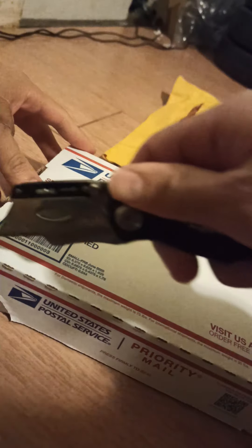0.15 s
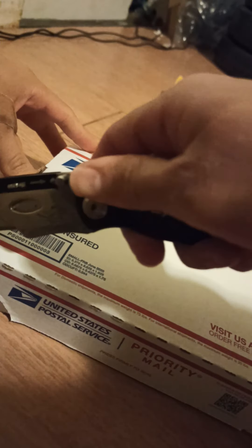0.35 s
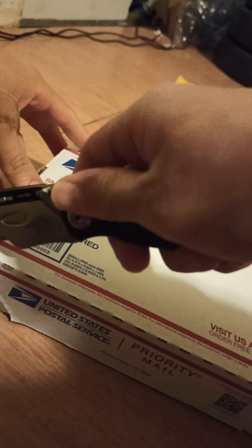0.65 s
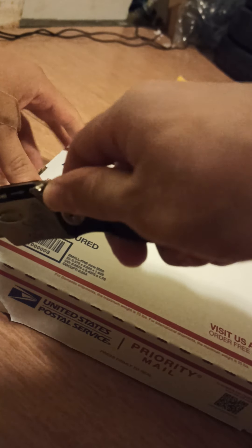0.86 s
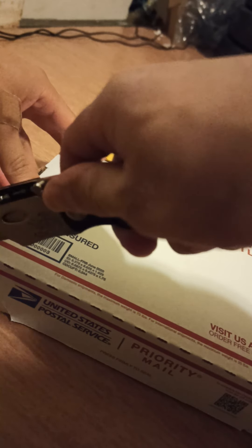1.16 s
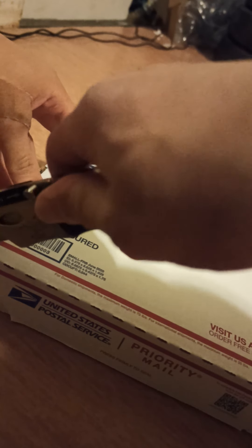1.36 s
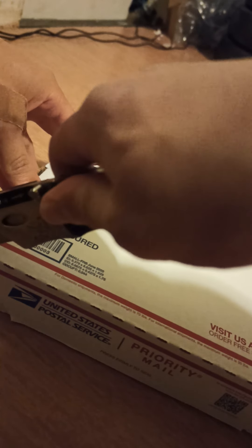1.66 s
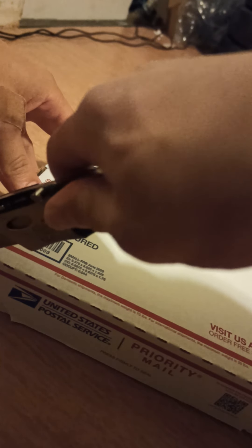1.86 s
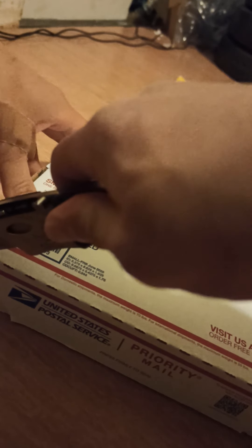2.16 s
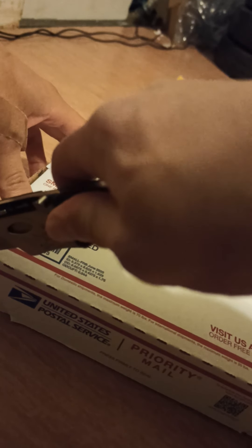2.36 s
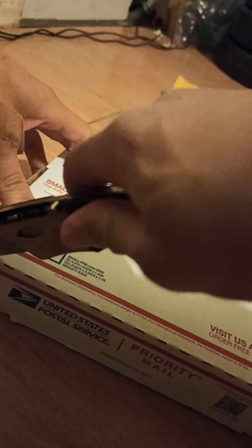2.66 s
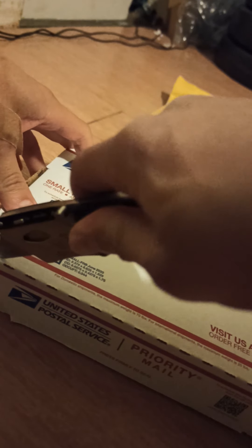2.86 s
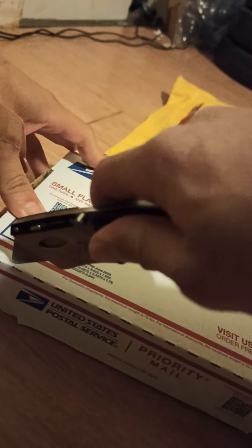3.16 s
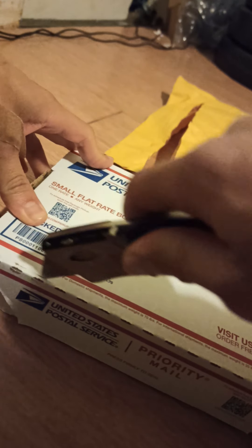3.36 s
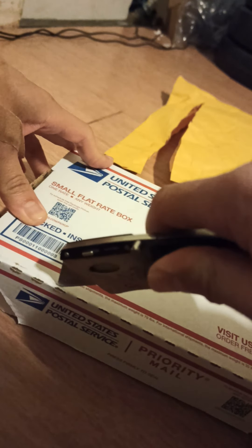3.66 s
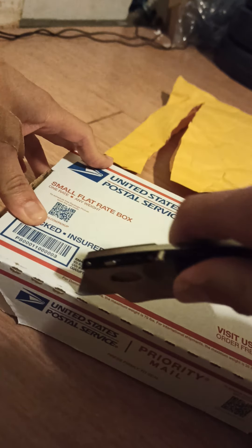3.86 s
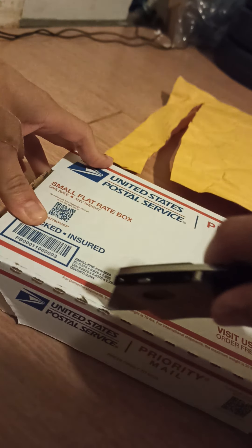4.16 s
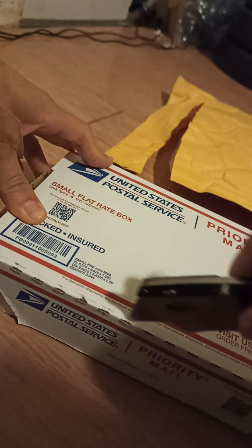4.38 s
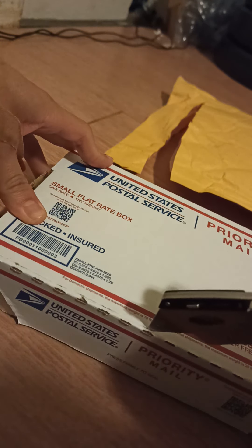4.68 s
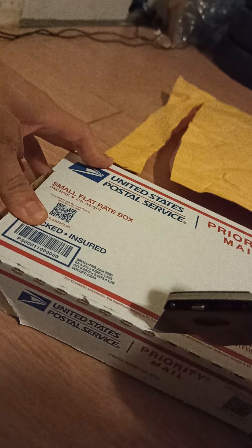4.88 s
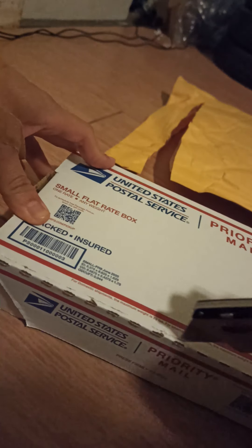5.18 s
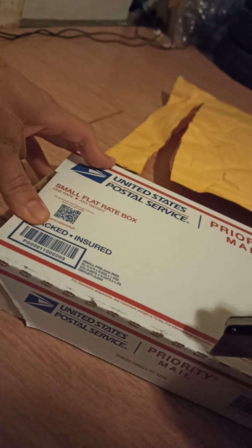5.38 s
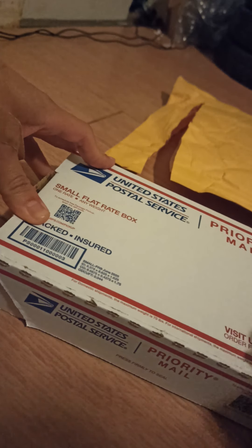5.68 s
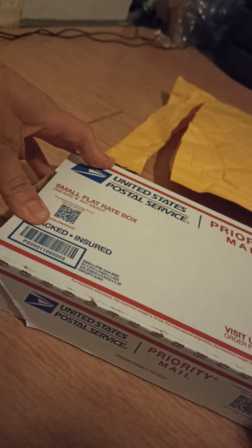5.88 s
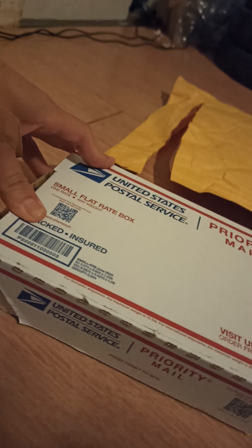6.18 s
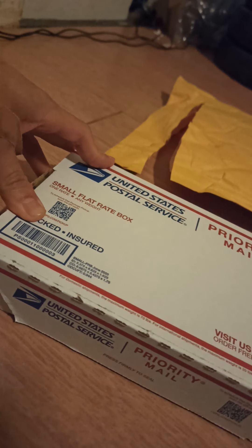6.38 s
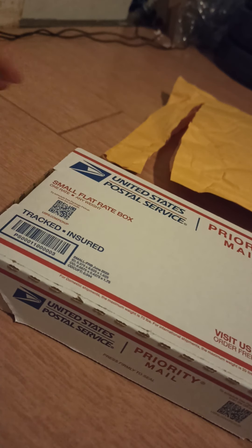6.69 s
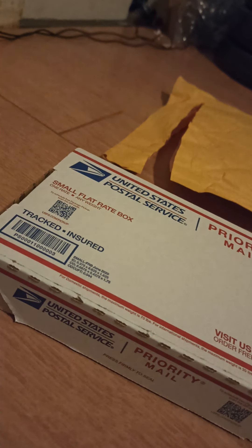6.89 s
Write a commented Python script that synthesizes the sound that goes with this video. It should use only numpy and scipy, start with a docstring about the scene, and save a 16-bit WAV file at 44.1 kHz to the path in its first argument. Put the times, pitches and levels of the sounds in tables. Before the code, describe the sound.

A small, furnished, quiet room with a low soft rumble and faint hiss; everything happens close to the microphone. For the first two seconds there is little: a small double knock near 0.7, faint short scratches of a blade on cardboard around 0.9 and 1.5 to 1.9. From about 2.4 the strokes firm up, short gritty stick-slip rasps ringing the hollow box, with fibrous tearing and a dry edge hiss. From 3.2 to 4.6 they are dense and loud, with knocks at 3.5 and a heavy catch at 4.1. A lighter lull near 4.8 to 5.0 leads to a hard double thump at 5.16, then rougher, more tearing strokes until 6.0. A last strong catch hits at 6.15 and the cutting fades. At 6.6 the knife clicks; around 6.75 to 6.9 its handle tocks on the wooden floor, steel knocks rapidly and scrapes briefly, then quiet.

```python
"""In a small quiet room with a wooden floor, a folding knife saws the taped edge of a cardboard box, close by.
Uneven stick-slip pulses ring the hollow box and excite fibre and edge noise; the strokes firm up, then ease off.
Harder catches are single blows: a heave of the lid, a box thump, a knock and a crack of tape.
At the end the knife clicks and is laid down: a handle tock, steel and floorboard blows, and a short scrape.
A low room rumble with faint hiss lies underneath."""
import sys
import numpy as np
from scipy import signal
from scipy.fft import rfft, irfft
from scipy.io import wavfile
from scipy.ndimage import uniform_filter1d

SR = 44100
rng = np.random.default_rng(int(sys.argv[2]) if len(sys.argv) > 2 else 0)


def int16_out(signal):
    """Quantize to a 16-bit WAV file."""
    q = np.round(np.clip(np.atleast_2d(signal).T, -1, 1) * 32767)
    wavfile.write(sys.argv[1], SR, q.astype(np.int16))


N = 310266
TIME = np.arange(N) / SR  # s
HZ = np.maximum(np.fft.rfftfreq(2 * N, 1 / SR), 1)

# Spectrum of the room's rumble and hiss: hz, level_db (relative)
ROOM_SPECTRUM = [(15, -76.5), (25, -57), (59, -15), (114, -6), (190, -9.5), (206, -16), (293, -15.5),
                 (489, -22.5), (1890, -37), (2160, -36), (2760, -41), (3080, -36.5), (5000, -43),
                 (6050, -40.5), (16000, -41.5)]
ROOM_RMS_DB = -56.5  # ahead of the overall tone
# Overall tone of everything heard: hz, gain_db
OVERALL_TONE = [(20, -24), (80, -1.5), (8300, 0), (9000, -12), (10000, -19), (11200, -28.5), (11700, -3.5),
                (16000, -1.5)]
TOP_HZ = 15900
# Stereo difference of the two microphone ports: hz, left_minus_right_db, left_lead_radians
PORT_DIFFERENCE = [(100, -1.5, 0.5), (930, -2.5, 0.15), (1930, -3.5, -1.07), (3200, -4.5, -3.5),
                   (3740, 3.5, 0.5), (4350, 5, -4.5), (5600, -2.5, 1), (6700, -3, -4), (7140, 9, 0.5),
                   (8960, -7, -2.5), (12900, 2, -0.9), (16900, -5, -3.5)]

# Blows of the steel as the knife clicks, lands and rocks: start_s, click_db, wood_knock_re_click_db
STEEL_BLOWS = [(6.625, -28, -20), (6.7658, -20.5, -5), (6.788, -24, -20), (6.7924, -16, -12),
               (6.854, -23.5, -9.5), (6.895, -39, 2.5), (6.908, -35, -0.5)]
# Hollow blow of the handle on the floor: start_s, tock_db
HANDLE_BLOWS = [(6.748, -20.5)]
# Slides of the knife on the floor: start_s, length_s, steel_scrape_db, boards_re_steel_db
FLOOR_SLIDES = [(6.632, 0.012, -40, -13), (6.759, 0.12, -30.5, -2)]
# Floorboard modes under the knife: pitch_hz, width_hz, level_db (relative)
BOARD_MODES = [(122, 115, -0.5), (329, 46, 6.5), (674, 85, 3.5), (1230, 380, -8), (1464, 62, 1),
               (2090, 500, -7)]
# Modes of the handle: pitch_hz, width_hz, level_db (relative)
HANDLE_MODES = [(800, 59, 3.5), (3500, 450, -15)]
# Spectrum of the knife's steel: hz, level_db (relative)
STEEL_SPECTRUM = [(1500, -11.5), (2500, -7.5), (3500, -3.5), (4250, 1.5), (4700, -1.5), (5100, -7),
                  (5900, -8), (6250, 1), (7600, 3.5), (8400, -0.5), (12000, -12.5), (15500, -6)]
# Modes of blade and handle: pitch_hz, width_hz, level_re_driving_sound_db
BLADE_MODES = [(1975, 80, -4), (2850, 120, -8), (4250, 120, -8), (4680, 90, -9), (6220, 90, -5),
               (7615, 40, 2)]
WOOD_THUMP_DB = -3  # low thump re knock
HANDLE_THUMP_DB, HANDLE_CLICK_DB = -14, -18  # re tock
SLIDE_RELEASE_DB_PER_S = 219

# The blade catches and breaks through: start_s, knock_db, low_thump_re_knock_db, tape_crack_re_knock_db
BLADE_CATCHES = [(0.0428, -53, 1.5, -13.0), (0.6775, -40.5, -2.5, -12), (0.683, -37.5, -3.5, 8.5),
                 (0.8477, -59, 3.5, 1.5), (1.4514, -51.5, 4.5, -10), (1.502, -40.0, -0.5, -8),
                 (1.991, -34, 4.5, -20.5), (2.136, -47.5, 0, -5.5), (2.2517, -35.5, -0.5, -24),
                 (2.3308, -48.0, -2, -5.5), (2.4379, -37, -18, -8.0), (2.4656, -33, -3, -1),
                 (2.5683, -51.0, 3, -5), (2.641, -47, -7, -13), (2.8253, -40.5, -3.5, -5),
                 (2.861, -44.0, -2.0, 3), (2.8772, -32, -16, -16.5), (3.1712, -54, 18, -20.0),
                 (3.2009, -30.5, -3, -1), (3.317, -32.5, 9.5, 5), (3.5283, -27.5, -3, -5),
                 (3.975, -47, -2.5, -4), (4.1128, -18.5, -1.5, -6), (4.304, -43.5, -3, -1),
                 (4.345, -28.5, -1, -3.0), (4.4116, -41, 17, 3), (4.554, -33.5, -8, -17),
                 (4.757, -47, 1.5, -0.5), (4.8977, -42.5, -0.5, 3.5), (5.0743, -29, 9.5, -12),
                 (5.1582, -19.5, -11, -15.5), (5.1629, -18, 6.5, -2.5), (5.382, -45.0, -17, -2),
                 (5.405, -45, 9, 4), (5.5241, -38.5, 4, -14.0), (5.6015, -28.0, -3, 0.5),
                 (5.667, -28.5, -4.0, -1.5), (6.129, -35.5, 1.0, -1), (6.1542, -16.5, -1, -2),
                 (6.369, -65.5, -4.0, 16), (6.4408, -51, 1.5, -7), (6.5685, -46.5, -4, -4.5)]
# Give of the lid, its heave read off against the thump: thump_db, heave_db
LID_HEAVE = [(-73, -71.5), (-29.5, -44), (-25, -33.5), (-18, -26.5), (-22, -19.5), (-12, -25.5)]

# Strokes of the blade, levels relative within the cutting layer:
# start_s (bite complete), length_s, box_force_db, start_to_end_swell_db, tear_re_force_db, hiss_re_force_db
BLADE_STROKES = [(0.917, 0.14, -51, 5, -20, -20.0), (1.525, 0.047, -46, -3.5, -15, -16),
                 (1.727, 0.066, -41, -1, -19.5, -15), (1.854, 0.085, -51.5, 1.0, -6.5, -1),
                 (2.003, 0.052, -58, -3, -8, 1.5), (2.137, 0.024, -49, -5, -6.5, -11),
                 (2.203, 0.12, -53.5, -8, -3, -2.0), (2.383, 0.096, -36.5, 16, -18, -11.5),
                 (2.641, 0.073, -33.5, 5.5, -18.5, -12), (2.864, 0.052, -28, 5, -18.5, -8.5),
                 (2.979, 0.16, -47.5, 3.5, -9.5, -8.5), (3.18, 0.11, -39, 25, -17, -6.0),
                 (3.315, 0.13, -25.5, -4.5, -15, -6.5), (3.548, 0.06, -33, -12, -13.0, -5),
                 (3.709, 0.2, -30, 5, -14.5, -7.0), (4.003, 0.071, -33, 8.5, -12.5, -5),
                 (4.108, 0.11, -29, -8.5, -13.5, -5.5), (4.33, 0.12, -27, 2.5, -15.5, -7.5),
                 (4.566, 0.075, -33.5, -5, -14.5, -7), (4.753, 0.073, -51.5, -7.0, -13, -8.0),
                 (4.867, 0.14, -50.5, -6, -9, -4.5), (5.078, 0.076, -46, -16, -7.5, -9),
                 (5.163, 0.12, -26, -0.5, -12, -6), (5.405, 0.23, -31, -6.5, -11.5, -6),
                 (5.622, 0.18, -27.5, -8.5, -6.0, -6), (5.838, 0.133, -29.5, 5.5, -2, -5),
                 (6.108, 0.042, -29, 0.5, -9, -10), (6.18, 0.061, -50, -6, -1.5, 0),
                 (6.432, 0.14, -60.5, -5, -2, 1.5)]
# Modes of the hollow box while it is cut: pitch_hz, width_hz, level_db (relative)
BOX_MODES = [(136, 160, -26.5), (220, 80, -7.5), (294, 27, -2), (352.8, 21.2, 3.5), (571.6, 65, 1),
             (681.4, 52, 2.5), (780, 54, 2.5), (905, 59.5, 4.5), (1192, 103, -0.5), (1331, 144, -3.5)]
# Spectrum of the tearing liner: hz, level_db (relative)
TEAR_SPECTRUM = [(1200, 8), (1600, 3), (1970, 16), (2300, 10.5), (2700, 7), (3300, -15.5), (4500, -29.5)]
# Spectrum of the hiss, pops and cracks at the cut edge: hz, level_db (relative)
EDGE_SPECTRUM = [(2000, -16), (3100, -3.5), (3900, -2), (4700, -2), (5100, -9), (5800, -8.5), (6250, 2.5),
                 (6900, 5), (7500, 1), (8300, -1.5), (9000, -3), (12000, -7.5), (15500, -5)]
# Every push of the hand bites, arches a little, then lets go
BITE_S, ARCH_DB, STROKE_RELEASE_DB_PER_S = 0.033, 4, 602


def undb(db):
    """Decibels to gain."""
    return 10 ** (np.asarray(db) / 20)


def unit(x):
    """Scale to rms 1."""
    return x / np.sqrt(np.mean(x ** 2))


def convolve(x, response):
    """Filter one or two channels, keeping the length."""
    x, response = np.atleast_2d(x, response)
    return signal.fftconvolve(x, response, axes=1)[:, :x.shape[1]]


def colour(x, points):
    """Shape a spectrum through (hz, db) points with a causal minimum-phase filter."""
    hz, db = np.transpose(points)
    size = 4096
    bins = np.log(np.fft.rfftfreq(2 * size, 1 / SR) + 1)
    gain = undb(np.interp(bins, np.log(hz), db))
    cepstrum = irfft(np.log(gain))
    # folding the cepstrum forward in time makes the phase minimum
    folded = np.r_[cepstrum[0], 2 * cepstrum[1:size]]
    response = irfft(np.exp(rfft(folded, 2 * size)))[:size]
    return convolve(x, response).reshape(np.shape(x))


def band(x, hz, kind, order=2):
    """Low-, high- or band-pass."""
    return signal.sosfilt(signal.butter(order, hz, kind, fs=SR, output="sos"), x)


def ring(x, modes):
    """Drive damped modes; neighbours move in opposite directions."""
    total = 0
    for k, (hz, width, db) in enumerate(modes):
        mode = signal.lfilter(*signal.iirpeak(hz, hz / width, SR), x)
        total = total + (-1) ** k * undb(db) * mode
    return total


def wander(rate):
    """Random motion of rms 1, gliding between `rate` new values a second."""
    knots = np.arange(0, TIME[-1] + 1, 1 / rate)
    return unit(np.interp(TIME, knots, rng.standard_normal(len(knots))))


def room_tone():
    """Low rumble of the house, partly alike on both sides, and a faint separate hiss."""
    shared = band(rng.standard_normal(N), 700, "low")
    own = rng.standard_normal((2, N))
    hiss = band(own, 510, "high", order=1)
    mix = shared + 0.39 * own + 1.7 * hiss
    return undb(ROOM_RMS_DB) * unit(colour(mix, ROOM_SPECTRUM))


def room(x, wet_db, t60_s):
    """A short, furnished room: a decaying noise tail, unrelated on the two sides."""
    t = TIME[:SR // 2]
    noise = band(rng.standard_normal((2, len(t))), 180, "high")
    tail = noise * undb(-60 * t / t60_s) * (t > .006)
    return undb(wet_db) * convolve(x, tail / np.linalg.norm(tail[0]))


def ports(x):
    """Hand and phone body shade and delay the close sound differently at each port."""
    hz, balance_db, lead = np.transpose(PORT_DIFFERENCE)
    # each side takes half the difference, in opposite senses
    half_gain = undb(np.interp(HZ, hz, balance_db) / 2)
    half = half_gain * np.exp(.5j * np.interp(HZ, hz, lead))
    return irfft(rfft(x, 2 * N) * np.array([half, 1 / half]))[:, :N]


def port_noise(size, apart=0.83):
    """Fine crackle from many points, so only partly alike at the two ports."""
    share = np.clip(apart, 0, 1)
    common = np.sqrt(1 - share ** 2) * rng.standard_normal(size)
    return common + share * rng.standard_normal((2, size))


def slips(rate, scatter_db, unevenness):
    """Stick-slip pulses at uneven intervals; a longer stick gives a bigger slip."""
    chance = rng.standard_normal((12000, 2))
    wait = np.exp(unevenness * chance[:, 0])
    at = (np.cumsum(wait / wait.mean()) * SR / rate).astype(int)
    size = np.sqrt(wait) * undb(scatter_db * np.clip(chance[:, 1], -2, 2))
    inside = at < N
    pulses = np.bincount(at[inside], size[inside], N)
    # the hand keeps the work done over a few hundredths of a second even
    return pulses / np.sqrt(uniform_filter1d(pulses ** 2, size=1800) + 1e-6)


def snaps(pulses, decay_s, rub):
    """Each slip sets off a decaying burst of crackle, over some smooth rubbing."""
    bursts = unit(signal.lfilter([1], [1, -np.exp(-1 / (decay_s * SR))], pulses))
    return port_noise(N) * np.sqrt(bursts ** 2 + rub ** 2)


def push(start, length, swell_db, release_db_per_s):
    """Gain of one push of the hand: a quick bite, an arched hold that swells or eases, an even decay."""
    gain = np.zeros(N)
    on = np.abs(TIME - start) < 1
    t = TIME[on] - start
    along = np.clip(t / length, 0, 1)
    bite = np.clip(1 + t / BITE_S, 0, 1) ** 2  # rises ahead of start, full at start
    hold_db = swell_db * (along - .5) - ARCH_DB * (2 * along - 1) ** 2
    gain[on] = bite * undb(hold_db - release_db_per_s * np.maximum(t - length, 0))
    return gain


def blade(x):
    """The steel adds its own ring to the treble."""
    return x + sum(ring(x, [mode]) for mode in BLADE_MODES)


def blows(table, bodies, crack, rise_s, crack_s):
    """Each blow mixes the body responses with a fresh burst of crackle; levels are rms over 10 ms."""
    out = np.zeros((2, 2 * N))
    size = len(crack)
    t = TIME[:size]
    for s, *levels_db in table:
        burst = port_noise(size) * (1 - np.exp(-t / rise_s)) * np.exp(-t / crack_s)
        start = int(s * SR)
        parts = [*bodies, convolve(burst, crack)]
        for part, db in zip(parts, levels_db):
            out[:, start:start + size] += undb(db) * unit(part) * np.sqrt(SR / 100 / size)
    return out[:, :N]


def knife_slides():
    """Steel grates over the floor: gritty stick-slip bursts colour the scrape and ring the boards."""
    pulses = slips(rate=220, scatter_db=4, unevenness=.7)
    grit = snaps(pulses, decay_s=.0015, rub=.6)
    scrape = unit(blade(colour(grit, STEEL_SPECTRUM)))
    boards = unit(ring(grit, BOARD_MODES))
    out = np.zeros((2, N))
    for start, length, db, boards_db in FLOOR_SLIDES:
        gain = undb(db) * push(start, length, 0, SLIDE_RELEASE_DB_PER_S)
        out += gain * (scrape + undb(boards_db) * boards)
    return out


def knife_down():
    """After a click, the handle lands, then the steel knocks the boards, rings briefly and scrapes."""
    tap = signal.unit_impulse(4096)
    wood = ring(tap, BOARD_MODES)
    click = blade(colour(tap, STEEL_SPECTRUM))
    thump = band(wood, 270, "low", order=3)
    knock = band(wood, [700, 2600], "band")
    tock = ring(tap, HANDLE_MODES)
    # rows: start_s, thump_db, body_db, click_db
    handle_rows = [(s, db + HANDLE_THUMP_DB, db, db + HANDLE_CLICK_DB) for s, db in HANDLE_BLOWS]
    steel_rows = [(s, db + wood_db + WOOD_THUMP_DB, db + wood_db, db) for s, db, wood_db in STEEL_BLOWS]
    handle = blows(handle_rows, (thump, tock), click, rise_s=0.0021, crack_s=0.0022)
    steel = blows(steel_rows, (thump, knock), click, rise_s=0.0021, crack_s=0.0022)
    return handle + steel + knife_slides()


def rattle(response, rattle_db, decay_s):
    """Loose flaps chatter on for a moment after a blow."""
    t = TIME[:len(response)]
    chatter = rng.standard_normal(len(t)) * np.exp(-t / decay_s) * (t > .003)
    return response + undb(rattle_db) * convolve(response, chatter / np.linalg.norm(chatter))[0]


def catches():
    """The blade jerks free: the whole lid heaves, the box thumps, damped by the hand, and the tape cracks."""
    tap = signal.unit_impulse(4096)
    # the damping hand widens every box mode
    box = ring(tap, [(hz, width * 1.94, db) for hz, width, db in BOX_MODES])
    lid = ring(tap, [(116, 110, -3.5), (228, 93, 9.0)])  # pitch_hz, width_hz, level_db
    heave = band(lid, 310, "low", order=3)
    thump = rattle(band(box, [215, 640], "band"), rattle_db=-8.5, decay_s=0.012)
    contact = unit(band(tap, [1000, 2000], "band"))
    knock = unit(band(box, [650, 2200], "band")) + undb(-16.5) * contact
    knock = rattle(knock, rattle_db=-11.0, decay_s=0.0021)
    crack = blade(colour(tap, EDGE_SPECTRUM))
    s, knock_db, depth_db, crack_db = np.transpose(BLADE_CATCHES)
    thump_db = knock_db + depth_db
    heave_db = np.interp(thump_db, *np.transpose(LID_HEAVE))
    rows = zip(s, heave_db, thump_db, knock_db, knock_db + crack_db)
    return blows(rows, (heave, thump, knock), crack, rise_s=.0018, crack_s=.0019)


def stroke_gains():
    """Gains of box, tearing and hiss, all driven by the force of the strokes."""
    power = np.zeros((3, N))
    for start, length, force_db, swell_db, tear_db, hiss_db in BLADE_STROKES:
        force = undb(force_db) * push(start, length, swell_db, STROKE_RELEASE_DB_PER_S)
        power += np.outer(undb([0, tear_db, hiss_db]) ** 2, force ** 2)
    return np.sqrt(power)


def box_walls(drive, shift_db):
    """As the blade travels over their nodes and bellies, the box modes wander in level, each on its own."""
    total = 0
    for k, mode in enumerate(BOX_MODES):
        level = undb(shift_db * wander(7.9))
        total = total + (-1) ** k * ring(drive, [mode]) * level
    return total


def cutting():
    """Slips of the blade shake the box, tear the liner and hiss at the edge."""
    force, tear, hiss = stroke_gains()
    pulses = slips(rate=290, scatter_db=1.0, unevenness=.6)
    fibres = snaps(pulses, decay_s=.0017, rub=.45)
    drive = unit(band(pulses, 100, "high")) + undb(-11) * unit(fibres)
    walls = box_walls(drive * force, shift_db=1.5) / np.std(ring(drive, BOX_MODES))
    box = band(walls, 1410, "low", order=3)
    liner = undb(-1.64 + 1.6 * wander(17)) * tear * unit(colour(fibres, TEAR_SPECTRUM))
    edge = undb(-1.0 + 1.7 * wander(40)) * hiss * unit(colour(fibres, EDGE_SPECTRUM))
    # single tough fibres pop; the power below 1 makes them stand out most in the light strokes
    pops = snaps(slips(rate=41, scatter_db=12.0, unevenness=0.82), decay_s=0.003, rub=0)
    tough = undb(-16.5) * hiss ** 0.76 * unit(colour(pops, EDGE_SPECTRUM))
    return undb(-0.54) * box + blade(liner + edge + tough)


def scene():
    """Cutting, catches and the knife laid down, in the room."""
    close = knife_down() + catches() + cutting()
    return room_tone() + room(close, wet_db=-11, t60_s=0.19) + ports(close)


def record(dry):
    """The overall tone: thin lowest bass, a deep dip around 11 kHz, and a steep cut at the top."""
    heard = np.array([colour(channel, OVERALL_TONE) for channel in dry])
    return signal.sosfilt(signal.ellip(10, .2, 70, TOP_HZ, fs=SR, output="sos"), heard)


dry = scene()
out = record(dry)
int16_out(out)
```